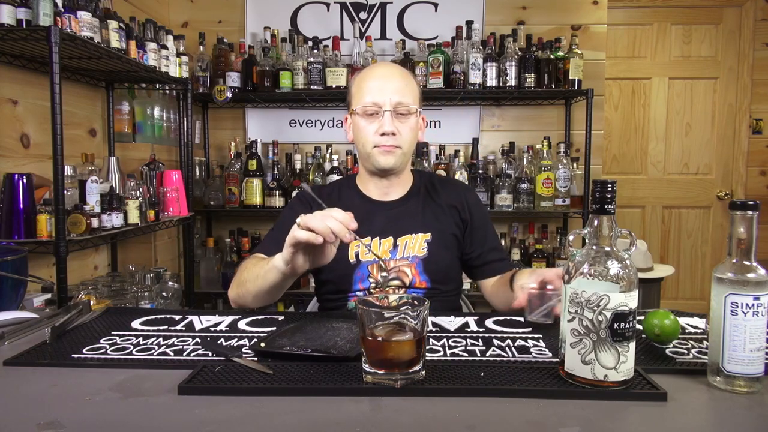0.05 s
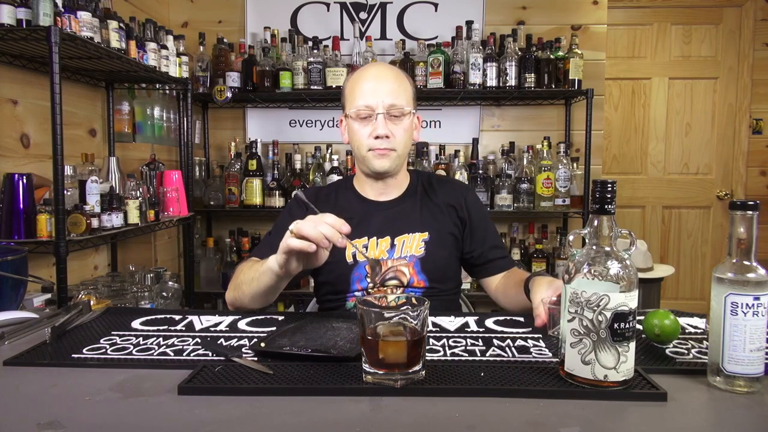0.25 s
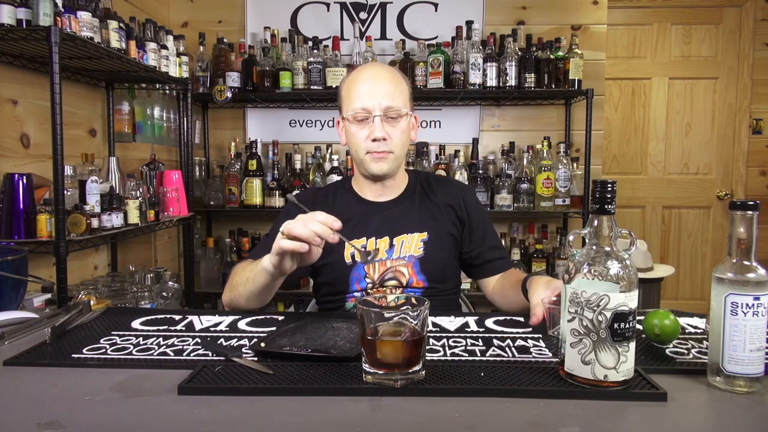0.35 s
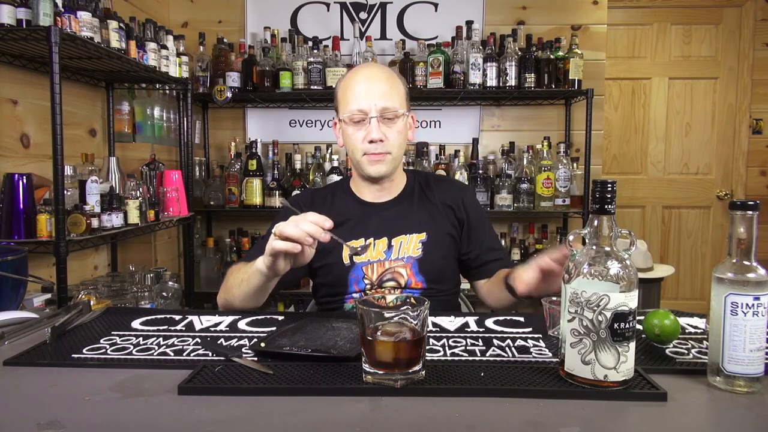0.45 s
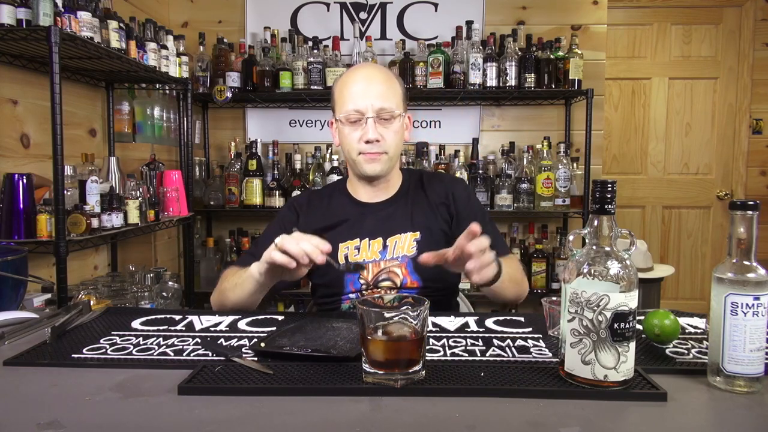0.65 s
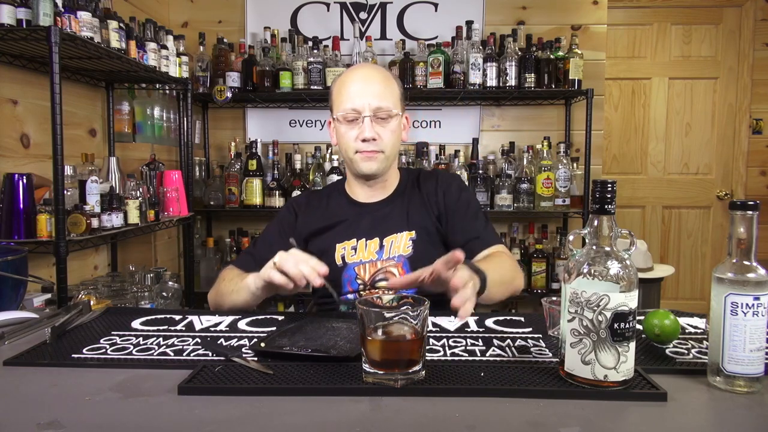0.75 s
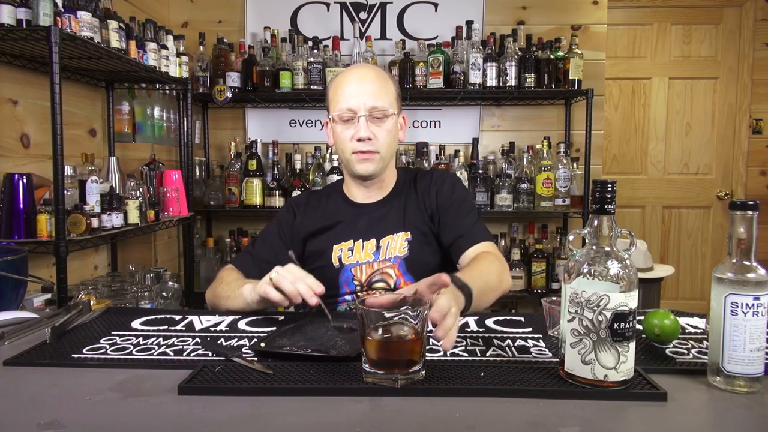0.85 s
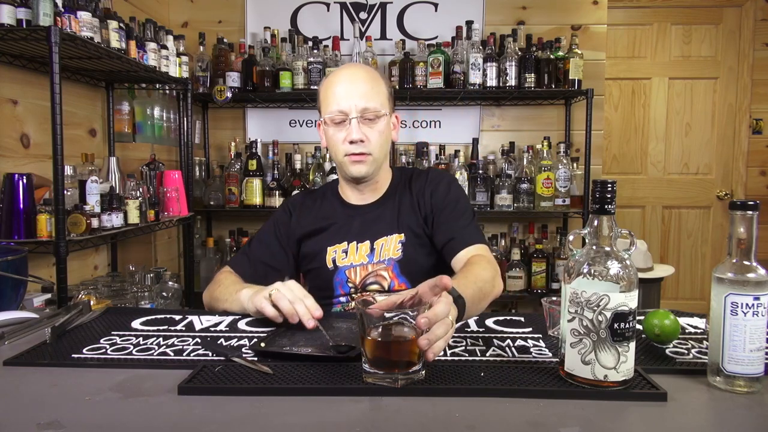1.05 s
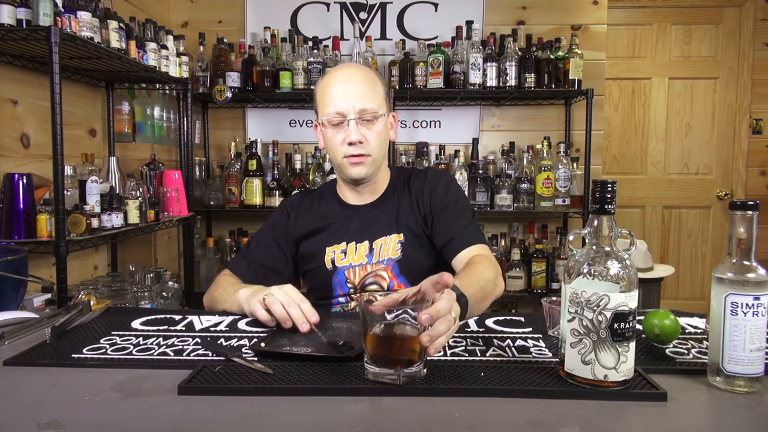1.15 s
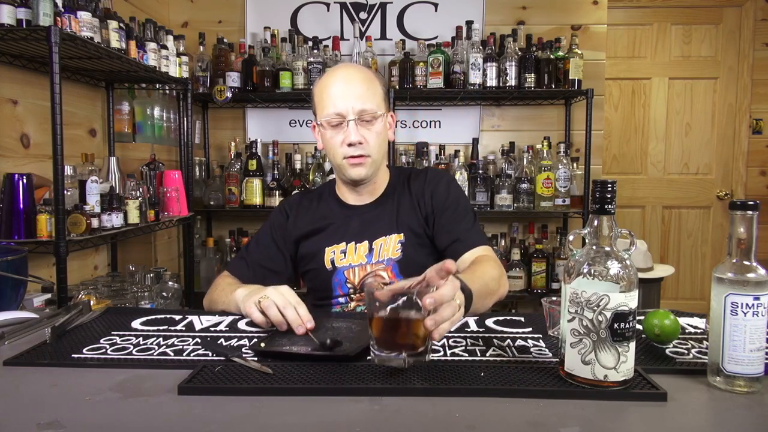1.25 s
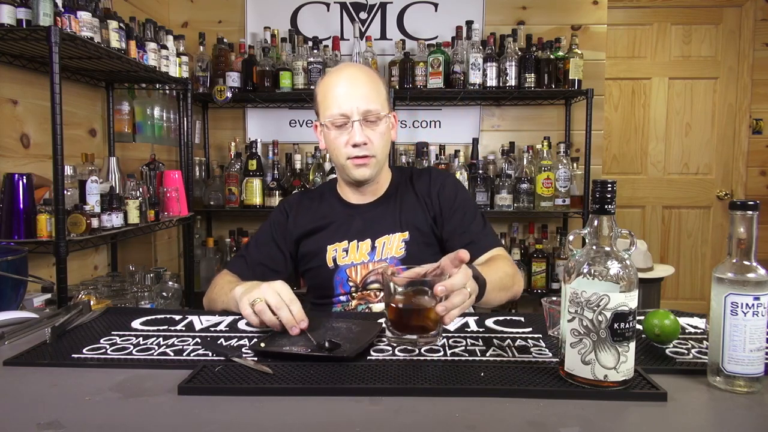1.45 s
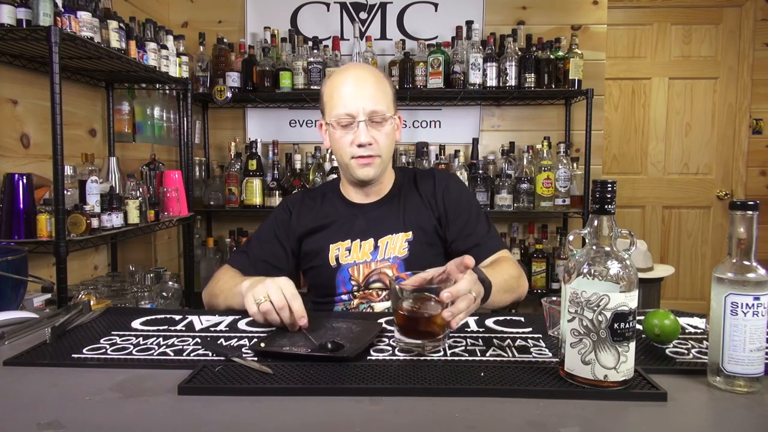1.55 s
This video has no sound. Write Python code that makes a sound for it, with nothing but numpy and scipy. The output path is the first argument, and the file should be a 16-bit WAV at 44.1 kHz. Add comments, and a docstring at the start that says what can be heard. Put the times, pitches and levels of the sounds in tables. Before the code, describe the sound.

A metal spoon gives a glass rim one bright ringing tap, then after a pause skids and clatters onto a tray while ice clinks faintly in the lifted glass; close microphone, small live room, faint hum.

```python
"""A bar spoon gives a glass rim one ringing tap, a dull rush follows; the spoon touches a tray,
skids and clatters to rest while the glass is lifted off its mat and ice clinks in it.
Soft low bumps and scuffs, hum, a faint whine and hiss lie underneath.
Glass, spoon and tray ring as sums of decaying modes; contacts are coloured noise bursts, skids noise.
A small live room answers glass and spoon; the recorder limits peaks and cuts the top."""
import sys
import numpy as np
from scipy import signal
from scipy.fft import rfft, irfft
from scipy.io import wavfile
from scipy.ndimage import uniform_filter1d, minimum_filter1d, map_coordinates

SR = 44100
rng = np.random.default_rng(int(sys.argv[2]) if len(sys.argv) > 2 else 0)


def persist_wave(psi):
    """Save psi, clipped to +-1, as 16-bit WAV."""
    counts = np.round(np.clip(psi, -1, 1) * 32767).astype(np.int16)
    wavfile.write(sys.argv[1], SR, np.atleast_2d(counts).T)


N = 70560

# spoon modes: f/Hz, relative level/dB, t60/s
SPOON_MODES = [(1054, -10, .14), (1243, -6, .3), (1290, -7, .22), (1420, -6, .2), (2290, -4, .16),
               (2660, -8, .22), (3100, -3, .1), (4000, -6, .18), (4620, -5, .13), (5135, -1, .16),
               (6350, -9, .27), (7990, -9, .16), (11830, -15, .25), (13300, -19, .25), (5716, -6, .55),
               (9710, -21, .5), (10370, -14, .42), (8280, -11, .17), (13810, -9, .09)]

SPOON_FLUTTER = 0.15  # relative depth, also for the tray
CRACK_ROOM_DB, GLASS_ROOM_DB = -12.5, -12
KNOCK_ROOM_DB, SPOON_RING_ROOM_DB, SKID_ROOM_DB = -9.5, -12, -6.5


def amp(db):
    """Decibels to gain."""
    return 10 ** (np.asarray(db) / 20)


def unit(x):
    """Scaled to rms 1."""
    return x / np.sqrt(np.mean(x ** 2) + 1e-20)


def along(points, hz):
    """Interpolate (f/Hz, value) points on a log frequency axis."""
    f, v = np.transpose(points)
    return np.interp(np.log(hz + 1), np.log(f + 1), v)


def since(start_s):
    """Seconds since start_s, zero before it."""
    return np.maximum(np.arange(N) / SR - start_s, 0)


def fade(t, t60_s):
    """Exponential decay by 60 dB in t60_s."""
    return np.exp(-np.log(1000) * t / max(t60_s, 1e-4))


def envelope(start_s, attack_s, hold_s, release_s):
    """Exponential attack, hold and release; release_s is a t60."""
    rise = 1 - np.exp(-since(start_s) / max(attack_s, 1e-5))
    return rise * fade(since(start_s + hold_s), release_s)


def colour(spectrum, tilt_db):
    """Gain of rms 1 over frequency, tilted by tilt_db per octave above 1 kHz."""
    hz = np.fft.rfftfreq(N, 1 / SR)
    return unit(amp(along(spectrum, hz) + tilt_db * np.log2(np.maximum(hz, 1000))))


def noise(spectrum):
    """Coloured noise of rms 1."""
    white = rfft(rng.standard_normal(N))
    return unit(irfft(white * colour(spectrum, 0), N))


def wobble(rate_hz):
    """Smooth random curve with rate_hz knots a second."""
    knots = rng.standard_normal(int(N * rate_hz / SR) + 4)
    return map_coordinates(knots, [np.arange(N) * rate_hz / SR])


def burst(shape, gain):
    """Hard contact: shaped noise, its energy evened over frequency, then coloured."""
    even_hz = 250  # smoothing width
    z = rfft(rng.standard_normal(N) * shape)
    power = np.abs(uniform_filter1d(np.abs(z) ** 2, int(even_hz * N / SR)))
    return np.linalg.norm(shape) * irfft(z / np.sqrt(power + 1e-20) * gain, N)


def partial(hz, start_s, t60_s, flutter=SPOON_FLUTTER):
    """One decaying mode, at most 0.5 s; level and phase flutter more as it fades."""
    rate_hz, onset_s = 70, 0.08
    out = np.zeros(N)
    start = int(start_s * SR)
    t = np.arange(min(N - start, SR // 2)) / SR
    depth = flutter * (1 - np.exp(-t / onset_s))
    knots = rng.standard_normal((2, rate_hz))
    in_phase, quadrature = [depth * np.interp(t * rate_hz, np.arange(len(k)), k) for k in knots]
    tone = np.imag((1 + in_phase + 1j * quadrature) * np.exp(2j * np.pi * hz * t))
    out[start:start + len(t)] = fade(t, t60_s) * tone / np.hypot(1, depth)
    return out


def in_room(x, wet_db):
    """Sound plus a diffuse noise tail whose decay depends on frequency."""
    # room decay: f/Hz, t60/s
    room_t60 = [(150, 0.18), (1200, 0.47), (4000, 0.4), (8000, 0.33), (15000, 0.36)]
    build_s = 0.00098
    hz, t, z = signal.stft(rng.standard_normal(SR // 2), SR, nperseg=256)
    decay = np.exp(-np.log(1000) * t / along(room_t60, hz)[:, None])
    z = z * decay * (1 - np.exp(-t / build_s))
    tail = signal.istft(z, SR, nperseg=256)[1]
    return x + amp(wet_db) * signal.fftconvolve(x, tail / np.linalg.norm(tail))[:N]


def background():
    """Steady sines for mains hum and a faint whine, over coloured hiss."""
    # hum and whine: f/Hz, rms level/dB
    hum_lines = [(60, -66.5), (120, -70), (180, -71.5), (240, -82), (3272, -102), (3325, -75.5)]
    # hiss colour: f/Hz, relative level/dB per Hz
    floor_colour = [(150, -45), (250, -9), (414, -6.5), (875, -11.5), (2810, -14), (3280, -11),
                    (3770, -14.5), (16000, -20.5)]
    floor_db = -61
    hum = np.zeros(N)
    for hz, db in hum_lines:
        hum += amp(db) * np.sqrt(2) * np.sin(2 * np.pi * (hz * since(0) + rng.random()))
    return hum + amp(floor_db) * noise(floor_colour)


def dull_swells():
    """Slow noise swells: a dull rush after the tap, other soft low bumps and uneven scuffs."""
    # swells: t/s, hold/s, low level/dB, scuff level/dB
    swells = [(0.136, 0.079, -63, -58), (0.253, .062, -42.5, -48.5), (0.487, 0.028, -59.5, -58.5),
              (0.548, 0.012, -68, -48.5), (0.645, 0.015, -60.5, -44), (1.029, 0.033, -41, -70),
              (1.168, 0.059, -44.5, -45.5), (1.255, 0.015, -31.5, -57), (1.313, 0.089, -31.5, -53),
              (1.458, 0.038, -44.5, -64), (1.548, 0.06, -45.5, -49)]
    # low colour: f/Hz, relative level/dB per Hz
    low_colour = [(25, -39), (60, -6.5), (95, 5.5), (170, 1.5), (330, 0), (700, -4.5), (2000, -40)]
    # scuff colour: f/Hz, relative level/dB per Hz
    scuff_colour = [(40, -38), (250, -3), (380, -2), (470, -22), (600, -0.5), (800, 3), (1100, 0.5),
                    (2500, -1), (6000, -12.5), (15000, -28.5)]
    attack_s, release_s = 0.017, 0.24
    rough_db, rough_hz = 2, 150
    out = np.zeros(N)
    for s, hold_s, low_db, scuff_db in swells:
        scuff = unit(noise(scuff_colour) * amp(rough_db * wobble(rough_hz)))
        mix = amp(low_db) * noise(low_colour) + amp(scuff_db) * scuff
        out += envelope(s, attack_s, hold_s, release_s) * mix
    return out


def glass():
    """Spoon or ice on glass: crack, low thump under each blow, then modes, damped when held."""
    # glass modes, close pairs beat, shortest give body: f/Hz, relative level/dB, free t60/s
    glass_modes = [(2680, -1.5, .4), (2690, -7.5, .4), (2709, -18, .52), (1150, -1, .004), (3150, 1, .007),
                   (2676, -6, .08), (2812, -17, .1), (5346, 0, .11), (5800, -21, .2), (5340, -16, .5),
                   (5357, -22, .45), (5412, -22, .35), (8366, -23, .42), (8410, -29, .35), (10310, -44, .3),
                   (11920, -33, .36), (11965, -37, .36)]
    # blows: t/s, ring level/dB, crack level/dB, ring tilt/dB per octave,
    # crack tilt/dB per octave, share of free ring time
    clinks = [(.2257, -13, -9, 0, 0, 1), (.9335, -61, -40, 0, 13, .7), (.2333, -36, -23, 0, 0, .2),
              (1.5275, -27, -32, -10, -9, .15)]
    # crack colour: f/Hz, relative level/dB per Hz
    crack_colour = [(30, 2), (200, -8), (600, -36), (1200, -8.5), (2000, -13), (2950, 11), (3700, 3.5),
                    (4600, 1.5), (5800, 5), (7000, -2), (9000, -10), (14000, -10.5), (16000, -27)]
    crack_t60_s = 0.011
    thump_db, thump_t60_s = -17.5, 0.084  # relative to ring; t60 when free
    late_after_s, late_t60_s = 0.13, 0.82  # extra decay of the late ring
    flutter, flutter_growth = 0.4, 0.7  # depth at first mode; exponent over frequency
    first_hz = glass_modes[0][0]
    ring, crack, thump = np.zeros((3, N))
    for s, ring_db, crack_db, tilt_db, crack_tilt_db, free in clinks:
        late = fade(since(s + late_after_s), late_t60_s)
        for hz, db, t60_s in glass_modes:
            ratio = hz / first_hz
            level = amp(ring_db + db + tilt_db * np.log2(ratio))
            ring += level * late * partial(hz, s, t60_s * free, flutter * ratio ** flutter_growth)
        blow = envelope(s, 0.0001, 0.00022, crack_t60_s)
        crack += amp(crack_db) * burst(blow, colour(crack_colour, crack_tilt_db))
        thump -= amp(ring_db + thump_db) * envelope(s, 0.00033, 0, thump_t60_s * free)
    return in_room(ring, GLASS_ROOM_DB) + in_room(crack, CRACK_ROOM_DB) + thump


def spoon_touch_and_skids():
    """Spoon touches tray, then skids: uneven hiss plus squeak, with spoon and tray modes."""
    # contacts: t/s, hold/s, hiss level/dB, squeak level/dB, spoon ring level/dB, tray ring level/dB
    contacts = [(.654, 0.029, -48.5, -78, -34, -51), (0.9863, 0.014, -38.5, -62, -65, -69),
                (0.9903, 0.021, -39, -61, -60, -68), (1.0063, 0.007, -62, -27, -45, -72)]
    # hiss colour: f/Hz, relative level/dB per Hz
    hiss_colour = [(500, -8), (2000, -8), (4300, -10), (5500, 6), (10000, 3.5), (13000, -4.5), (15500, -2)]
    # squeak colour: f/Hz, relative level/dB per Hz
    squeak_colour = [(900, -28), (2000, -15), (3000, -5), (4200, 0.5), (5200, -15.5), (7000, -19),
                     (15000, -19)]
    # tray modes: f/Hz, relative level/dB, t60/s
    tray_modes = [(393, -1, 0.21), (595, 4, 0.13), (1058, 0.5, 0.17), (1890, 3, 0.12), (2120, 2.5, 0.2)]
    release_s = 0.022
    rough_db, rough_hz = 1, 700
    sing_hz, sing_octaves, sing_rise_s = 6270, 0.19, 0.015  # band of spoon modes fed, build-up
    held_t60_s = 0.24  # longest t60 while fingers hold the spoon
    friction, ring = np.zeros((2, N))
    for s, hold_s, hiss_db, squeak_db, sing_db, tray_db in contacts:
        grip = unit(amp(rough_db * wobble(rough_hz)))
        mix = amp(hiss_db) * noise(hiss_colour) + amp(squeak_db) * noise(squeak_colour)
        friction += envelope(s, 0.0009, hold_s, release_s) * grip * mix
        sing = np.zeros(N)
        for hz, db, t60_s in SPOON_MODES:
            feed = np.exp(-(np.log2(hz / sing_hz) / sing_octaves) ** 2)
            sing += amp(db) * feed * partial(hz, s, min(t60_s, held_t60_s))
        ring += amp(sing_db) * sing * (1 - np.exp(-since(s) / sing_rise_s))
        for hz, db, t60_s in tray_modes:
            ring += amp(tray_db + db) * partial(hz, s, t60_s)
    return in_room(friction, SKID_ROOM_DB) + ring


def spoon_knocks():
    """Spoon clatters on tray: each contact is a clack, a short uneven buzz and spoon modes."""
    # knocks: t/s, body level/dB, middle level/dB, treble level/dB, ring level/dB,
    # treble and ring tilt/dB per octave
    knocks = [(1.0136, -42, -35, -31, -63, -0.5), (1.037, -20, -19, -28.5, -49, 0.5),
              (1.1083, -31.5, -30.5, -48, -56.5, -7), (1.1856, -38, -55, -41, -66, -1),
              (1.217, -38, -47, -48, -75, 1), (1.238, -50, -33.5, -53, -55.5, -10),
              (1.2525, -23.5, -23, -50, -44.5, -8), (1.271, -29, -17, -19, -58, -2),
              (1.2731, -13.5, -4.5, -10, -38.5, -4.5), (1.2781, -22, -37, -22, -34, -5.5),
              (1.3262, -20, -14.5, -8, -31.5, -2), (1.3693, -25, -25, -20, -47, -8),
              (1.391, -62, -25, -57, -104, -3), (1.397, -14, -18.5, -38, -35, -6.5),
              (1.3981, -24, -15.5, -13.5, -38, -5), (1.471, -23.5, -29.5, -37.5, -59, -2),
              (1.562, -24.5, -27, -30.5, -46.5, -7.5)]
    # body colour: f/Hz, relative level/dB per Hz
    body_colour = [(20, -42), (60, -45), (300, -18), (650, -9), (900, -0.5), (1270, 4), (1700, -6.5),
                   (3000, -15.5), (12000, -65)]
    # middle colour: f/Hz, relative level/dB per Hz
    middle_colour = [(200, -85), (900, -17), (1600, -2), (2400, 3.5), (3100, 3.5), (4200, -4.5), (5200, -6),
                     (8000, -14.5), (16000, -67)]
    # treble colour: f/Hz, relative level/dB per Hz
    treble_colour = [(600, -100), (3000, -8), (5100, -1), (5900, -5.5), (6700, -1.5), (9000, -6.5),
                     (11000, -16), (15000, -26), (16000, -26.5)]
    blow_t60_s = 0.0059
    buzz_t60_s, buzz_db = 0.082, -12.5
    chatter_db, chatter_hz = 5, 400  # random level of the buzz
    out = np.zeros(N)
    centre_octave = np.mean([np.log2(mode[0]) for mode in SPOON_MODES])
    for s, body_db, middle_db, treble_db, ring_db, tilt_db in knocks:
        chatter = unit(amp(chatter_db * wobble(chatter_hz)))
        buzz = amp(buzz_db) * chatter * envelope(s, 0.0052, 0, buzz_t60_s)
        body_shape = envelope(s, 0.00056, 0.0015, blow_t60_s) + buzz
        body = amp(body_db) * burst(body_shape, colour(body_colour, 0))
        middle = amp(middle_db) * colour(middle_colour, 0)
        treble = amp(treble_db) * colour(treble_colour, tilt_db)
        clack_shape = envelope(s, 0.00019, 0.00073, blow_t60_s) + buzz
        clack = burst(clack_shape, np.hypot(middle, treble))
        ring = np.zeros(N)
        for hz, db, t60_s in SPOON_MODES:
            tilt = tilt_db * (np.log2(hz) - centre_octave)
            level_db = ring_db + db + tilt + rng.normal(0, 0.46)
            ring += amp(level_db) * partial(hz, s, t60_s)
        out += in_room(body + clack, KNOCK_ROOM_DB) + in_room(ring, SPOON_RING_ROOM_DB)
    return out


def scene():
    """All sources at one microphone."""
    return (background() + dull_swells() + glass() + spoon_touch_and_skids() + spoon_knocks())[None]


def record(dry):
    """Fast peak limiter (windowed minimum gain, smoothed), then a steep low-pass."""
    limit_db, hold_s, top_hz = -2.3, 0.002, 15800
    hold = max(int(hold_s * SR), 2)
    needed = np.minimum(1, amp(limit_db) / (np.abs(dry) + 1e-9))
    limited = dry * uniform_filter1d(minimum_filter1d(needed, hold), hold)
    low_pass = signal.ellip(10, 0.1, 90, top_hz, fs=SR, output="sos")
    return signal.sosfilt(low_pass, limited)


dry = scene()
out = record(dry)
persist_wave(out)
```